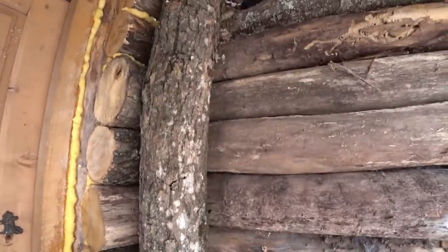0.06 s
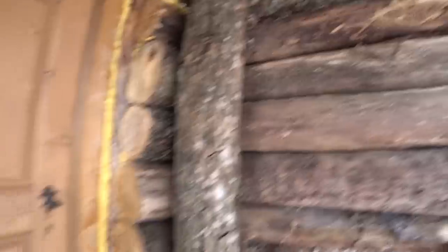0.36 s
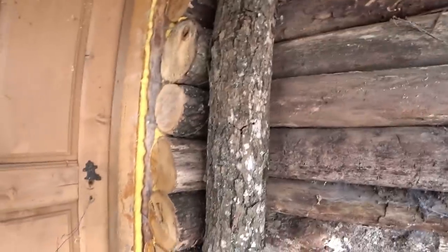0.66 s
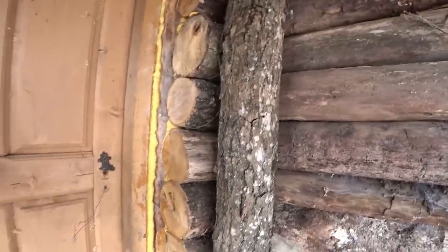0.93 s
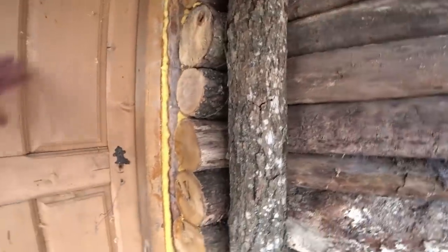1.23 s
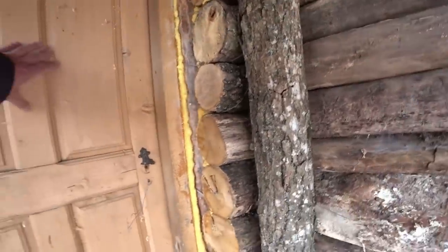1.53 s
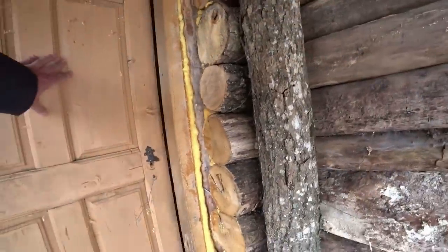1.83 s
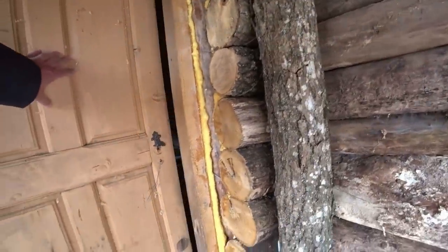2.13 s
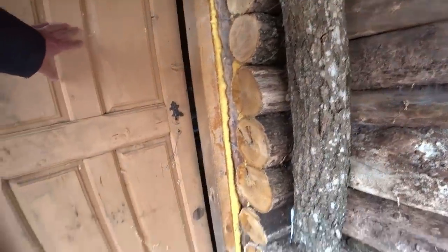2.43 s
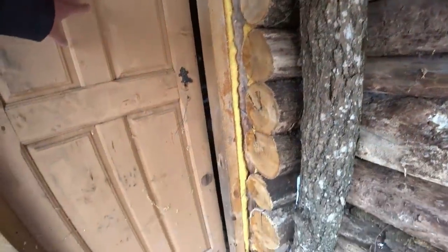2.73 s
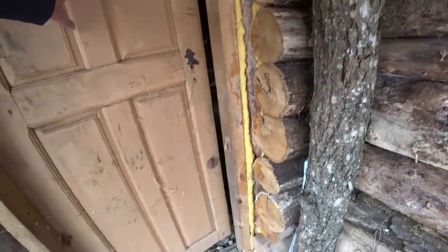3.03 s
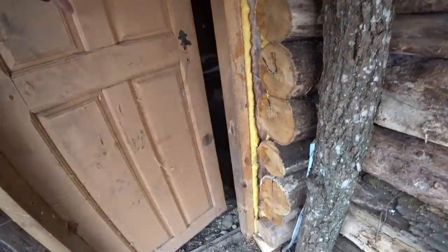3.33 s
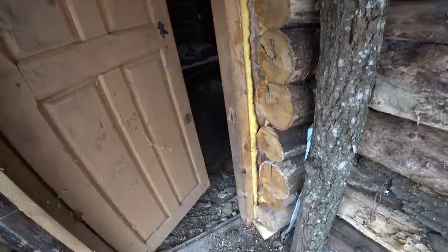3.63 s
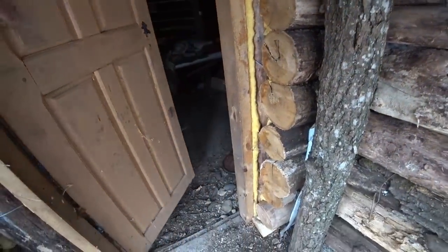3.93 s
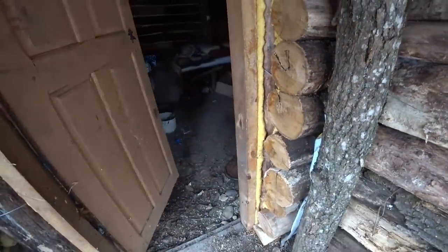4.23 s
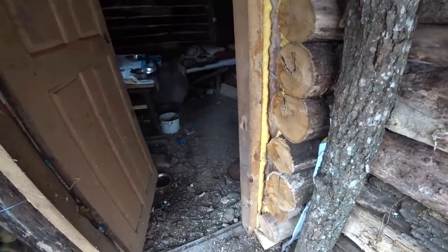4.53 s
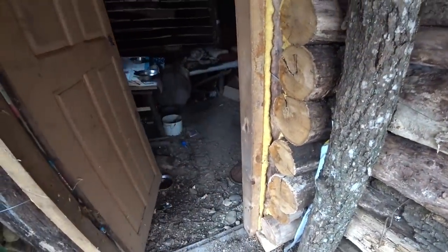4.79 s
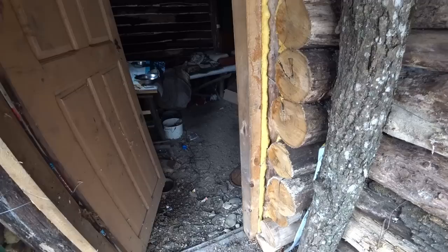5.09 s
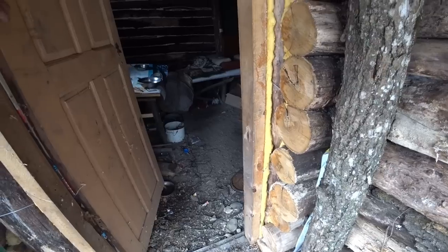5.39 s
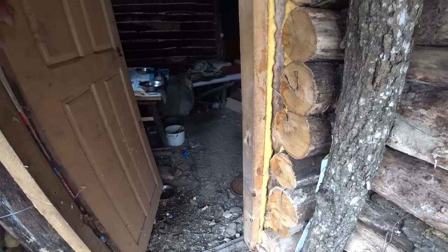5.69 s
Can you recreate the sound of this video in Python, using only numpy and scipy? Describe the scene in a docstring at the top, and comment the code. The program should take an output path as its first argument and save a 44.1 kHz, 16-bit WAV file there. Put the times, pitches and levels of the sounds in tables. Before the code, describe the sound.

Close by in quiet outdoor air, a stuck wooden door rattles lightly, then thumps and bangs in its frame as it is shoved harder. It comes free with a sharp metal latch clack and scrapes softly open on dry hinges. Grit then crunches and twigs snap as two footsteps land on a hollow wooden board. Faint clothing rustle goes with the movements.

```python
"""Wooden knocks and rattles: the heavy panelled door of a log shed is shoved by hand and binds in its frame.
It comes free with a latch clack and swings inwards, rubbing on its frame and singing on dry hinges.
Then two steps boom on a hollow board, with snapping twigs and crunching grit. Blows ring the modes of
wood and iron; friction drives those of door and hinge. Clothes rustle close by over a quiet outdoor hush."""
import sys
import numpy as np
from scipy import signal
from scipy.io import wavfile

SR = 44100
rng = np.random.default_rng(int(sys.argv[2]) if len(sys.argv) > 2 else 0)


def output_pcm(signal):
    """Save a mono or channel-first signal as 16-bit PCM at the path in sys.argv[1].

    Samples are clipped to [-1, 1] before scaling.
    """
    pcm = np.clip(np.atleast_2d(signal).T, -1, 1) * 32767
    wavfile.write(sys.argv[1], SR, np.round(pcm).astype(np.int16))


N = 262373
AGE = np.arange(SR // 3) / SR   # time since the onset of a short burst [s]

# modes of the door leaf: (frequency [Hz], level [dB], t60 [s])
DOOR_MODES = [(43.54, 0.5, 0.54), (100, -11, 0.11), (112.4, 0, 0.22), (204.4, -9.5, 0.21), (248, -15, 0.2),
              (281, -7.5, 0.13), (337, -9, 0.065), (389, -10.5, 0.099), (540.6, -9.5, 0.14),
              (679, -2, 0.049), (808, -8.5, 0.086), (930, -6, 0.023), (1088, -8.5, 0.12),
              (1610, -3.5, 0.047), (2240, -4, 0.035), (2953, 4, 0.026), (3560, -0.5, 0.039)]
# modes of the hollow board: (frequency [Hz], level [dB], t60 [s])
BOARD_MODES = [(113.6, -15, 0.29), (210, -25.5, 0.78), (248.3, 0, 0.16), (273, -6, 0.12),
               (518, -14.5, 0.097), (850, -15.5, 0.1), (1136, -26, 0.31)]


def from_db(db):
    """Decibels to gain."""
    return 10 ** (np.asarray(db) / 20)


def rms_one(x):
    """Scale to unit power."""
    return x / np.sqrt(np.mean(x ** 2) + 1e-20)


def at_hz(points, hz):
    """Each column of a spectrum at one frequency."""
    freqs, *columns = np.transpose(points)
    return [np.interp(np.log(hz), np.log(freqs), column) for column in columns]


def add(out, s, sound):
    """Mix a sound in from time s."""
    at = round(s * SR)
    out[:, at:at + sound.shape[-1]] += sound[..., :N - at]


def fade(t, t60):
    """Exponential decay, 60 dB in t60."""
    return np.exp(-np.log(1000) * t / t60)


def low_pass(x, hz):
    """Dull the treble, as a soft contact does."""
    return signal.sosfilt(signal.butter(2, min(hz, SR / 2 - 100), fs=SR, output="sos"), x)


def pan(x, left_db):
    """Lean a sound to the left or right."""
    return x * from_db([[left_db / 2], [-left_db / 2]])


def swell(s, rise_s, fall_s, level_db, held_s=0):
    """Gain of one gesture: it climbs 20 dB in rise_s up to time s, holds, then sinks 20 dB per fall_s."""
    t = np.arange(N) / SR - s
    away = np.maximum(-t, 0) / rise_s + np.maximum(t - held_s, 0) / fall_s
    return from_db(level_db - 20 * np.minimum(away, 10))


def together(gains):
    """Overlapping gestures add in power."""
    return np.sqrt(sum(gain ** 2 for gain in gains))


def hump(hz):
    """A broad spectrum around one pitch: (frequency [Hz], density [dB])."""
    return [(hz / 6, -20), (hz / 2, -9), (hz, 0), (hz * 2, -14)]


def noise(spectrum, size, likeness=None):
    """Stereo noise in third octaves, starting at unit power; if the spectrum has t60s, the bands decay."""
    # narrow stereo image of a near sound: (frequency [Hz], left-right likeness [-1..1])
    near_likeness = [(60, 1), (250, 0.91), (600, 1), (1400, 0.86), (4000, 0.76), (8000, 0.71),
                     (11000, 0.57)]
    edges_hz = 22 * 2 ** (np.arange(28) / 3)
    white = rng.standard_normal((2, 2, size + SR // 10))
    t = np.arange(size) / SR
    out, power = 0, 0
    for k, (low, high) in enumerate(zip(edges_hz, edges_hz[1:])):
        hz = np.sqrt(low * high)
        level_db, *t60 = at_hz(spectrum, hz)
        alike = np.clip(at_hz(likeness or near_likeness, hz)[0], -1, 1)
        band_pass = signal.butter(2, (low, high), "band", fs=SR, output="sos")
        mid, side = from_db(level_db) * signal.sosfilt(band_pass, white[k % 2])[:, -size:]
        band = np.sqrt(1 + alike) * mid + np.sqrt(1 - alike) * side * [[1], [-1]]
        power += np.mean(band ** 2)
        out = out + (band * fade(t, t60[0]) if t60 else band)
    return out / np.sqrt(power)


def grain(size, depth_db, span_s):
    """Quick random flutter of level, as fibres or grains catch and slip."""
    t = np.arange(size) / SR
    flutter = np.interp(t / span_s, np.arange(size), rng.standard_normal(size))
    return rms_one(from_db(depth_db * flutter))


def ring(modes, spread_db, width):
    """One blow on a set of modes; high modes reach the two sides out of step."""
    t, out = np.arange(SR // 2) / SR, 0
    for hz, level_db, t60 in modes:
        strength, skew = rng.standard_normal(2)
        lag = width * skew * min(hz / 1000, 1) * np.array([[1], [-1]])
        tone = np.sin(2 * np.pi * hz * t + lag)
        out = out + from_db(level_db + spread_db * strength) * tone * fade(t, t60)
    return out


def resonate(x, modes):
    """Drive a set of modes continuously; unit power."""
    out = 0
    for hz, db, t60 in modes:
        q = np.pi * hz * t60 / np.log(1000)
        out = out + from_db(db) * signal.lfilter(*signal.iirpeak(hz, q, fs=SR), x)
    return rms_one(out)


def outdoor_hush():
    """A quiet, steady bed of outdoor air with a wide stereo image."""
    # colour of the air: (frequency [Hz], density [dB])
    colour = [(25, -5), (45, -11), (66, -8), (110, -12), (160, -15.5), (440, -11.5), (700, -12),
              (1200, -12.5), (2200, -18.5), (3900, -27.5), (8000, -30), (11000, -34)]
    # its wide stereo image: (frequency [Hz], left-right likeness [-1..1])
    likeness = [(60, 1), (170, 0.12), (490, -0.85), (1400, -0.92), (4000, -0.53), (11000, .07)]
    return from_db(-57) * noise(colour, N, likeness)


def shed_reverb(x):
    """A dull reverberation from the log room behind the door."""
    t = np.arange(SR) / SR
    build_up = np.minimum(t / 0.038, 1)
    tail = low_pass(rng.standard_normal((2, SR)), hz=2700) * fade(t, t60=0.53) * build_up
    return signal.fftconvolve(x, rms_one(tail) / np.sqrt(SR), axes=1)[:, :N]


def body_movement():
    """With every move sleeves swish and feet shuffle, both finely grained."""
    # moves of the body: (peak time [s], rise [s], fall [s], cloth level [dB], shuffle level [dB])
    moves = [(.2, .25, .3, -64.5, -60), (.41, 0.35, 0.12, -58.5, -57.5), (.9, 1.3, 0.37, -62.5, -58),
             (1.362, 0.45, 0.48, -55, -51.5), (1.728, 0.19, 0.14, -47.5, -46),
             (2.02, 0.72, 0.62, -57, -58.5), (2.33, 0.49, 0.067, -60.5, -64),
             (3.28, 0.27, 0.44, -68, -57.5), (3.46, 0.33, 0.59, -55.5, -67), (4.02, 1, 1.2, -69.5, -65.5),
             (4.652, 0.3, 0.15, -52.5, -50.5), (4.87, 0.15, 0.22, -53.5, -49.5),
             (5.7, 0.45, .6, -66.5, -71)]
    # bright swish of cloth: (frequency [Hz], density [dB])
    cloth_colour = [(1200, -3), (2500, 0.5), (4500, -1), (7000, -2), (11000, -11.5)]
    # low shuffle of feet: (frequency [Hz], density [dB])
    shuffle_colour = [(40, 9), (110, 3.5), (240, 0), (400, -0.5), (900, -2.5), (2000, -10.5), (4000, -30)]
    still_cloth, still_shuffle = from_db(-73.5), from_db(-68.5)   # between moves
    swish = together([still_cloth] + [swell(s, rise, fall, db) for s, rise, fall, db, _ in moves])
    shift = together([still_shuffle] + [swell(s, rise, fall, db) for s, rise, fall, _, db in moves])
    cloth = swish * noise(cloth_colour, N) * grain(N, depth_db=2, span_s=0.0024)
    shuffle = shift * noise(shuffle_colour, N) * grain(N, depth_db=1.44, span_s=0.014)
    return cloth + shuffle


def brushing():
    """A palm or a sole slides briefly, with a bright, grainy hiss."""
    # slides over a surface: (peak time [s], level [dB])
    slides = [(0.991, -53.5), (1.381, -41.5), (4.457, -51), (4.612, -45.5)]
    contact = together(swell(s, rise_s=0.017, fall_s=0.048, level_db=db) for s, db in slides)
    return contact * noise(hump(hz=5680), N) * grain(N, depth_db=1, span_s=0.00041)


def ticking():
    """Wood and grit give small bright ticks, each around a pitch of its own."""
    # ticks: (time [s], level [dB], centre [Hz], t60 [s])
    ticks = [(0.61, -49.5, 6300, 0.024), (0.668, -48.5, 4600, 0.061), (0.783, -34.5, 8200, 0.02),
             (1.519, -44.5, 6300, 0.033), (1.625, -35, 6300, 0.021), (4.9856, -46.5, 10100, 0.08),
             (5.0122, -44.5, 8750, 0.095), (5.177, -55, 6100, 0.19)]
    out = np.zeros((2, N))
    for s, level_db, hz, t60 in ticks:
        add(out, s, from_db(level_db) * noise(hump(hz), len(AGE)) * fade(AGE, t60))
    return out


def twigs():
    """Dry twigs snap underfoot in short bursts of noise."""
    # snaps: (time [s], level [dB])
    snaps = [(4.495, -47), (4.626, -47), (4.662, -46), (4.844, -30.5), (4.9388, -38), (5.0367, -34)]
    # breaking twig: (frequency [Hz], density [dB], t60 [s])
    colour = [(200, -10, 0.058), (684, 4, 0.044), (1360, -10, 0.07), (2330, -0.5, 0.02), (3010, 2, 0.015),
              (4100, -28, 0.037), (11100, -33, 0.051)]
    out = np.zeros((2, N))
    for s, level_db in snaps:
        add(out, s, from_db(level_db) * noise(colour, len(AGE)))
    return out


def grit():
    """Small stones click at random under the soles, at a few pitches, and set the board humming."""
    # one mode for each kind of stone: (frequency [Hz], level [dB], t60 [s])
    stone_modes = [(432, -2, 0.017), (634, 12.5, 0.04), (895, 5, .025), (1174, 7.5, 0.044),
                   (1480, -16, .02), (2050, -18, 0.019), (2800, -5, 0.011), (4900, 0, 0.012),
                   (6000, 3, 0.0071)]
    # soles grind over the grit: (peak time [s], rise [s], fall [s], level [dB])
    grinds = [(4.495, 0.098, 0.08, -59.5), (4.655, 0.054, 0.075, -51.5), (4.85, 0.23, 0.43, -60)]
    clicks_per_s, size_spread_db = 30, 3   # for each kind of stone
    stones, jolts = 0, 0
    for hz, level_db, t60 in stone_modes:
        signs = rng.choice([-1, 1], N)
        sizes = from_db(size_spread_db * np.minimum(rng.exponential(1, N), 4))
        clicks = (rng.random(N) < clicks_per_s / SR) * signs * sizes + 1e-18
        ringing = from_db(level_db) * resonate(clicks, [(hz, level_db, t60)])
        stones = stones + pan(ringing, left_db=rng.normal(0, 3))
        jolts = jolts + clicks
    weight = together(swell(*grind) for grind in grinds)
    board_hum = from_db(2.5) * resonate(jolts, BOARD_MODES)
    return weight * (rms_one(stones) + board_hum)


def steps():
    """A soft sole sets the hollow board booming while grit crunches beneath it."""
    # sole contacts: (time [s], thud level [dB], crunch level [dB], crunch brightness [Hz])
    contacts = [(4.711, -39.5, -73, 2000), (4.864, -19.5, -37.5, 10000), (5.069, -30.5, -43.5, 2040)]
    # crushed grit: (frequency [Hz], density [dB])
    colour = [(400, -2.5), (1000, -3), (2000, -5), (4500, -5), (8000, -7.5), (11000, -16)]
    thud_rise_s, crunch_rise_s, crunch_lead_s, first_touch = 0.009, 0.014, 0.0015, 0.55
    press = np.minimum(first_touch + AGE / crunch_rise_s, 1)
    release = fade(np.maximum(AGE - crunch_rise_s, 0), t60=0.16)
    out = np.zeros((2, N))
    for s, thud_db, crunch_db, bright_hz in contacts:
        thud = ring(BOARD_MODES, spread_db=3, width=0.19)
        load = np.minimum(np.arange(thud.shape[1]) / SR / thud_rise_s, 1)
        add(out, s, pan(from_db(thud_db) * thud * load, left_db=-2))
        crunch = low_pass(noise(colour, len(AGE)), bright_hz)
        crunch *= grain(len(AGE), depth_db=0.5, span_s=0.00029)
        add(out, s - crunch_lead_s, from_db(crunch_db) * crunch * press * release)
    return out


def door_rubbing():
    """Uneven friction sounds directly and through the door; the dry hinge sings and squeaks once."""
    # rubs on frame and sill: (peak time [s], hold [s], fall [s], rub level [dB], hinge level [dB])
    rubs = [(1.46, 0.056, .08, -58.5, -87), (1.711, 0.036, 0.019, -36.5, -80), (1.81, 0.11, .19, -56, -66),
            (3.43, 0.12, 0.19, -53.5, -67), (3.6, 0.092, 0.15, -56, -63.5)]
    # wood dragging on wood: (frequency [Hz], density [dB])
    colour = [(40, 3), (110, 2.5), (200, 3.5), (500, -8.5), (1600, -15), (3000, -22.5), (8000, -25.5)]
    # dry hinge resonances: (frequency [Hz], level [dB], t60 [s])
    hinge_modes = [(555, -7, 0.077), (977, -3, 0.13), (1230, -6, 0.043), (1516, 3, 0.12), (1810, -7, 0.21),
                   (1910, 4, 0.066), (2000, -7, .12), (2210, 1, 0.058), (2920, -15, 0.098)]
    # partials of the hinge's squeak: (frequency [Hz], level [dB], t60 [s])
    squeak_modes = [(1653, -7, .11), (3300, -3, .025), (4670, -6, .02)]
    rise_s = 0.076
    pressure = together(swell(s, rise_s, fall_s, db, held_s) for s, held_s, fall_s, db, _ in rubs)
    turning = together(swell(s, rise_s, fall_s, db, held_s) for s, held_s, fall_s, _, db in rubs)
    friction = noise(colour, N) * grain(N, depth_db=1, span_s=0.0064)
    wood = from_db(-2.5) * friction + resonate(friction, DOOR_MODES)
    squeak = swell(s=2.315, rise_s=0.047, fall_s=0.09, level_db=-63) * resonate(friction, squeak_modes)
    return pressure * wood + turning * resonate(friction, hinge_modes) + squeak


def latch():
    """The iron latch clacks and bounces as the door comes free."""
    # strikes of the latch: (time [s], level [dB])
    clacks = [(3.389, -29), (3.391, -31), (3.3955, -62)]
    # ring of the iron: (frequency [Hz], level [dB], t60 [s])
    iron_modes = [(2210, -18, 0.047), (3110, -9, 0.061), (3220, -3.5, 0.047), (3450, 2.5, 0.021),
                  (4410, -14, 0.041), (5110, 1, 0.018), (5560, -27, 0.038), (6410, -5, 0.025)]
    # noisy clank of each strike: (frequency [Hz], density [dB], t60 [s])
    clank_colour = [(500, -23, 0.036), (1100, -2.5, 0.085), (1590, -5.5, 0.036), (3170, 3, 0.049),
                    (6500, -9, 0.057), (7900, -21, 0.019), (11000, -9, .02)]
    out = np.zeros((2, N))
    for s, level_db in clacks:
        add(out, s, from_db(level_db) * ring(iron_modes, spread_db=4.5, width=0.36))
        add(out, s, from_db(level_db) * noise(clank_colour, len(AGE)))
    return out


def door_knocks():
    """Each blow sways the leaf, booms in the panels and cracks on the surface."""
    # blows: (time [s], leaf sway [dB], panel boom [dB], wood ring [dB], crack [dB], brightness [Hz])
    knocks = [(.67, -52.5, -45.5, -49.5, -37.5, 1520), (.719, -64, -42.5, -46, -40, 890),
              (.763, -64, -51, -36.5, -33.5, 676), (.783, -41, -39, -54, -37.5, 9000),
              (.872, -47, -46.5, -40.5, -33, 685), (1.013, -45.5, -76, -72, -68, 600),
              (1.3823, -35, -23.5, -36, -41, 363), (1.407, -38, -41, -40, -30.5, 670),
              (1.628, -32.5, -36, -44, -34.5, 1690), (1.681, -55, -50, -39, -30, 3320),
              (1.712, -22.5, -40, -29, -31, 620), (1.735, -32.5, -19.5, -38, -20.5, 720),
              (1.7489, -53, -50, -29.5, -23, 5600), (1.752, -55, -25.5, -31, -25, 4500),
              (3.389, -65, -34, -28, -56, 700), (3.489, -68, -56, -60, -41, 8000)]
    # crowded short modes of the wood: (frequency [Hz], density [dB], t60 [s])
    crack_colour = [(153, -23, 0.082), (395, -4, 0.066), (870, -3.5, 0.075), (1740, -3, 0.028),
                    (3380, -10.5, 0.071), (6040, -8, 0.044), (11000, -14, 0.099)]
    hard_contact_hz = 744   # a softer contact lingers and damps the leaf
    push = from_db(-20) * fade(AGE, t60=0.0036)   # the contact's own pulse, ahead of the crowded modes
    out = np.zeros((2, N))
    for s, sway_db, boom_db, ring_db, crack_db, contact_hz in knocks:
        sustain = min(contact_hz / hard_contact_hz, 1)
        # how the blow drives the leaf: (frequency [Hz], level [dB], t60 scale [ratio])
        drive = [(50, sway_db, 1), (90, boom_db, sustain), (120, boom_db, sustain),
                 (190, ring_db, sustain)]
        modes = []
        for hz, level_db, t60 in DOOR_MODES:
            drive_db, t60_scale = at_hz(drive, hz)
            modes.append((hz, level_db + drive_db, t60 * t60_scale))
        # neighbouring modes swing in opposite senses
        body = ring(modes[::2], spread_db=1, width=0.25) - ring(modes[1::2], spread_db=1, width=0.25)
        add(out, s, pan(low_pass(body, contact_hz), left_db=-2.3))
        crack = noise(crack_colour, len(AGE)) - push
        add(out, s, pan(from_db(crack_db) * low_pass(crack, contact_hz), left_db=2.7))
    return out


def scene():
    """Door and footsteps before the shed, over the outdoor hush."""
    contacts = door_knocks() + latch() + steps() + twigs() + ticking() + brushing()
    hush = outdoor_hush()
    room = from_db(-27.5) * shed_reverb(contacts)
    return hush + room + contacts + pan(door_rubbing(), left_db=-0.5) + grit() + body_movement()


def record(dry):
    """A steep low-pass cuts the top treble."""
    cutoff_hz = 11190
    return signal.sosfilt(signal.ellip(12, 0.2, 70, cutoff_hz, fs=SR, output="sos"), dry)


dry = scene()
out = record(dry)
output_pcm(out)
```